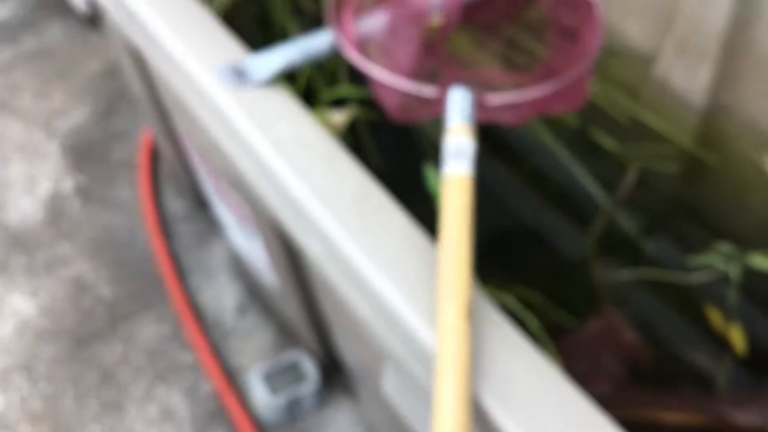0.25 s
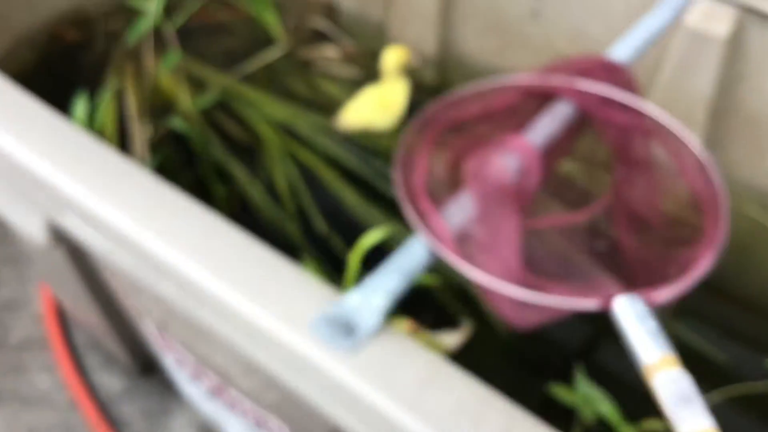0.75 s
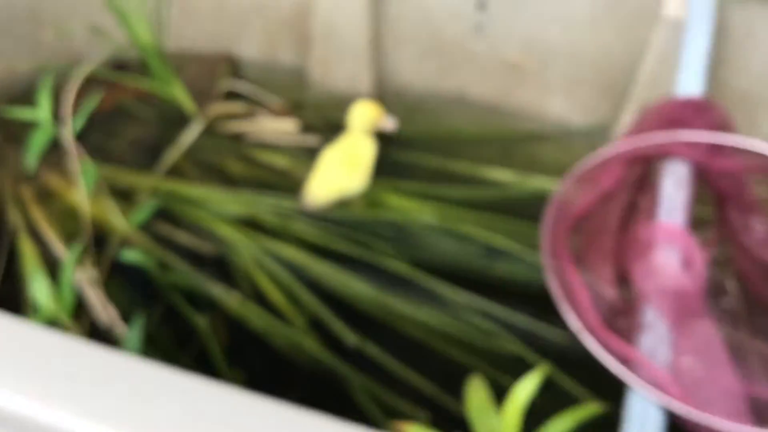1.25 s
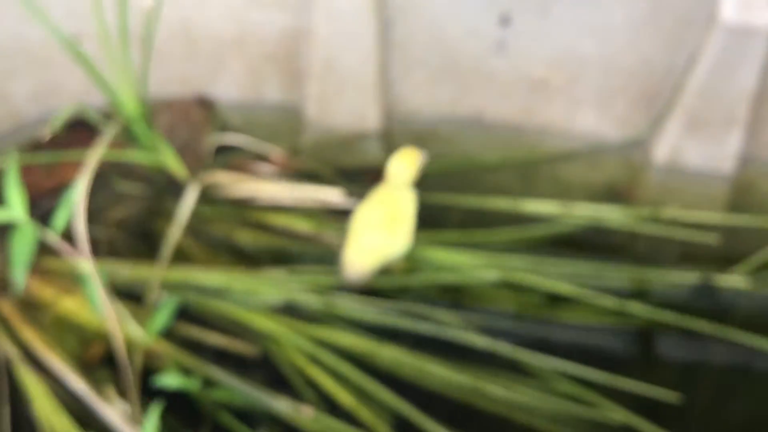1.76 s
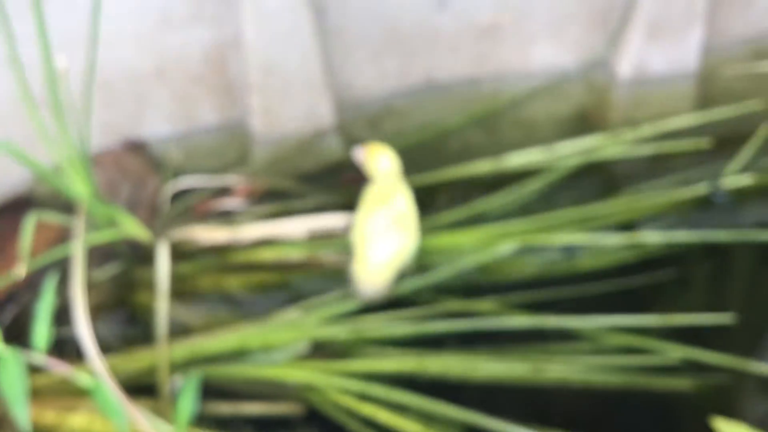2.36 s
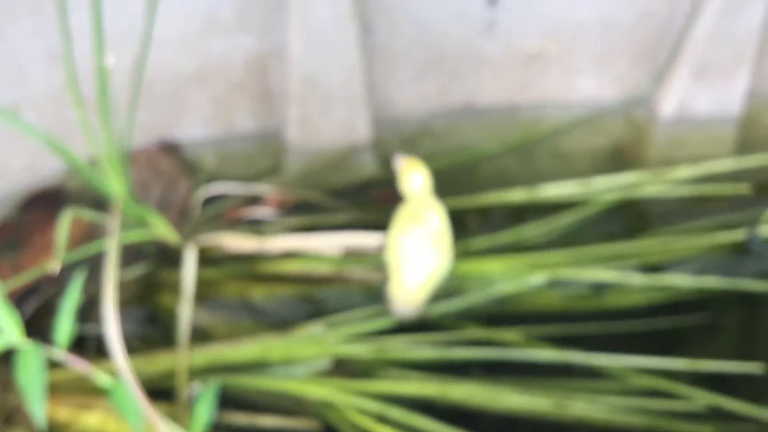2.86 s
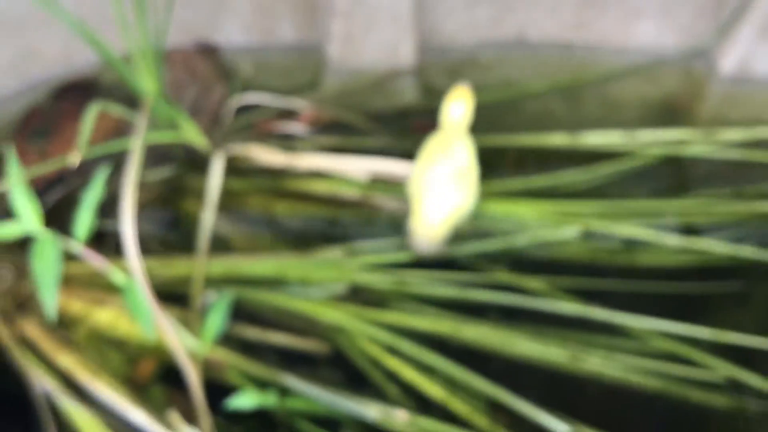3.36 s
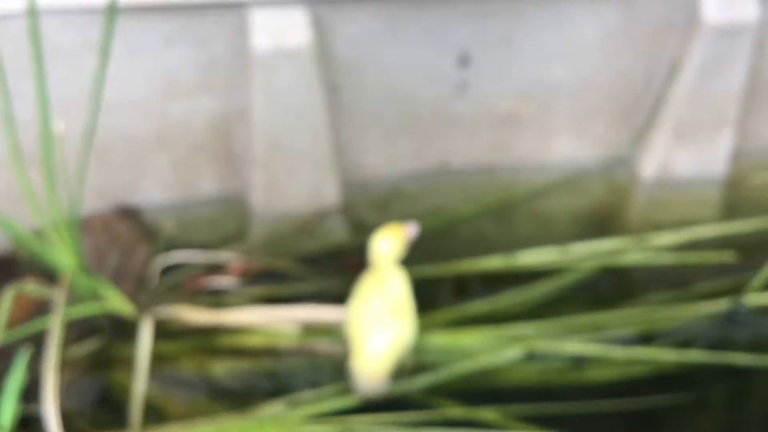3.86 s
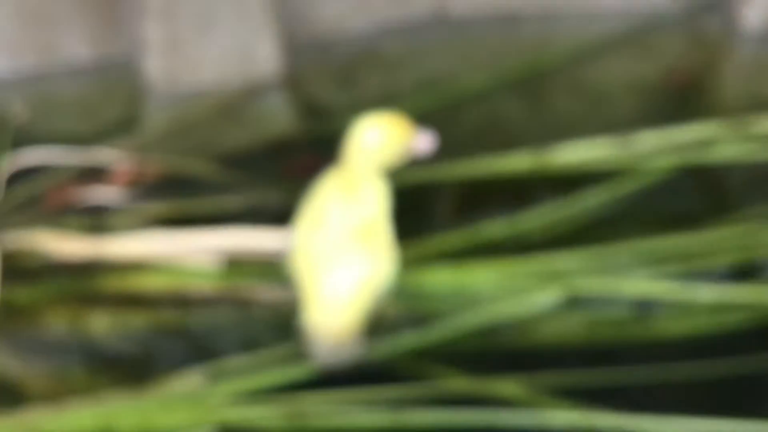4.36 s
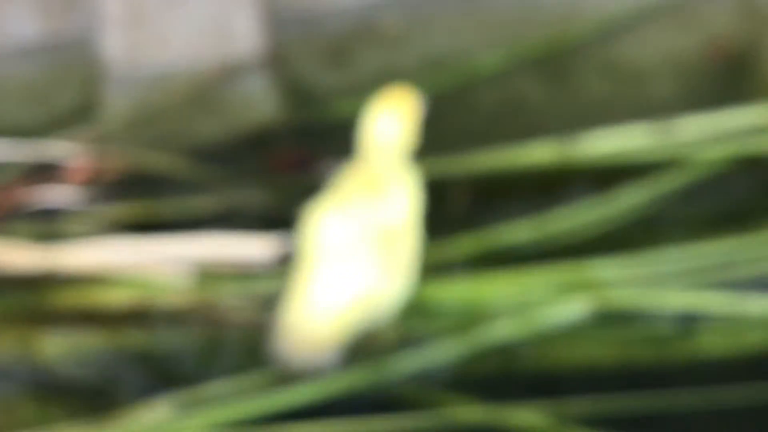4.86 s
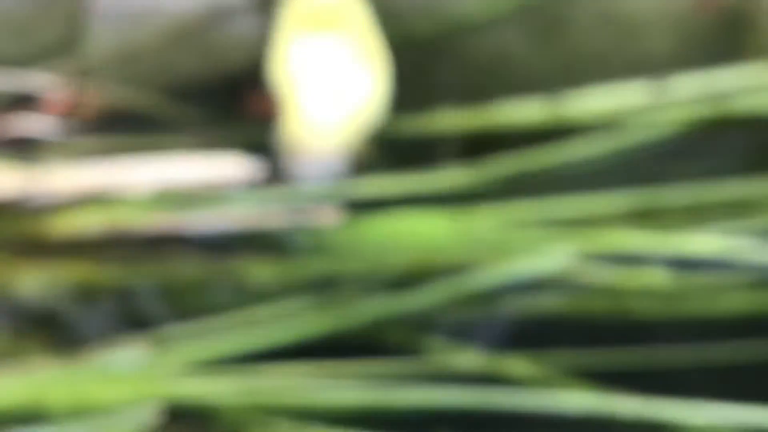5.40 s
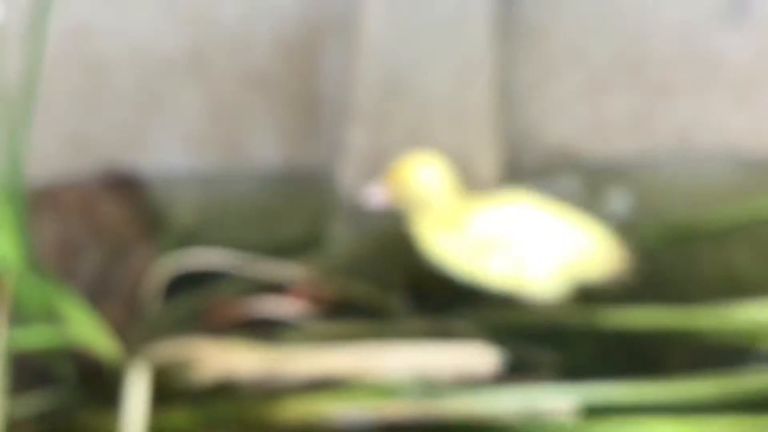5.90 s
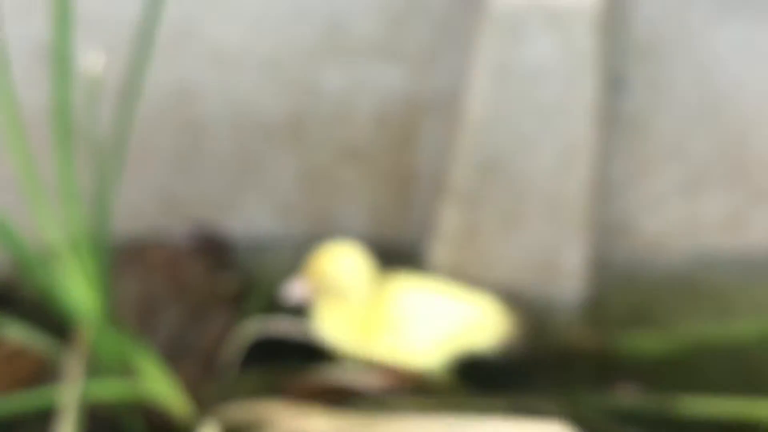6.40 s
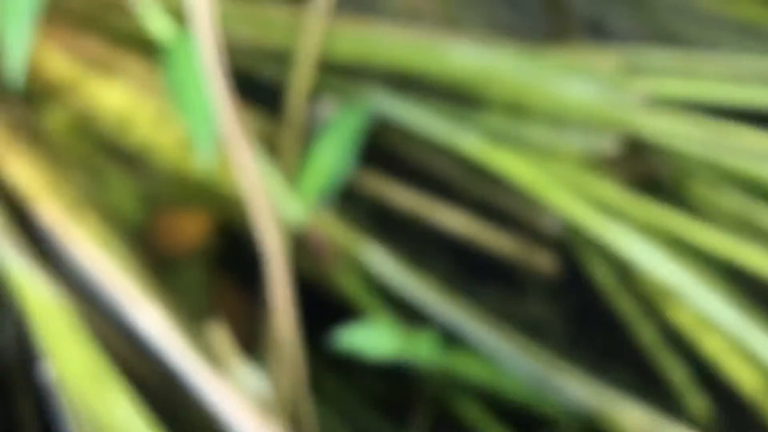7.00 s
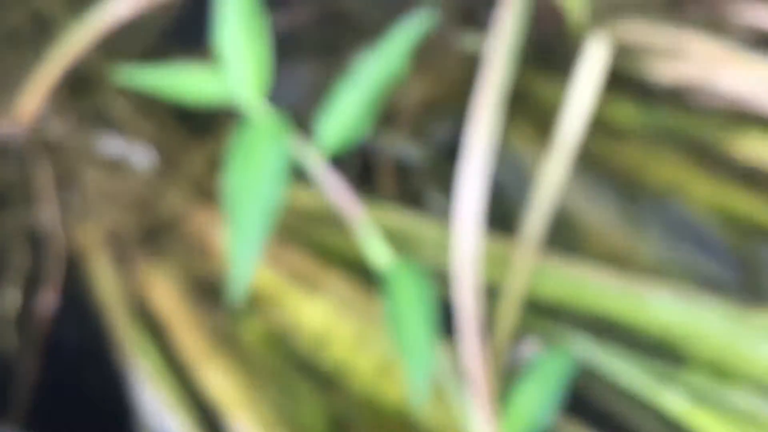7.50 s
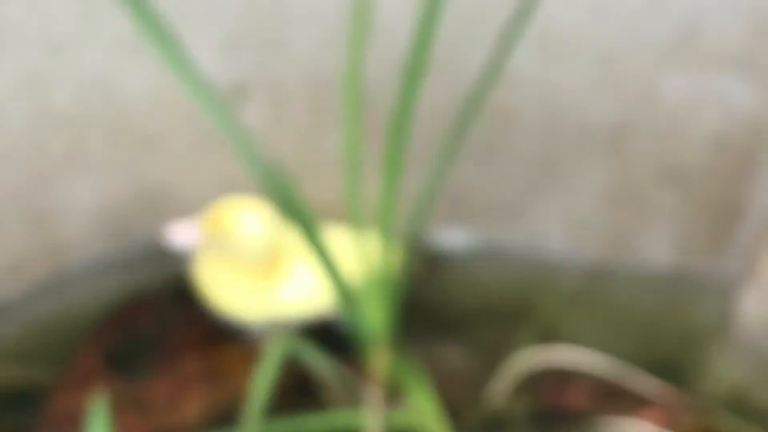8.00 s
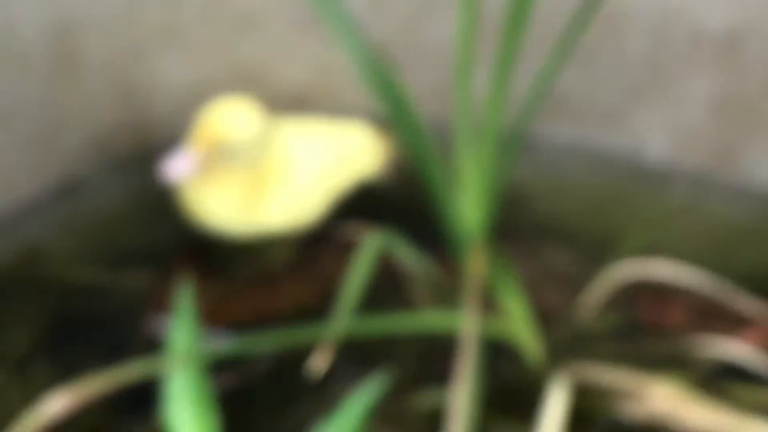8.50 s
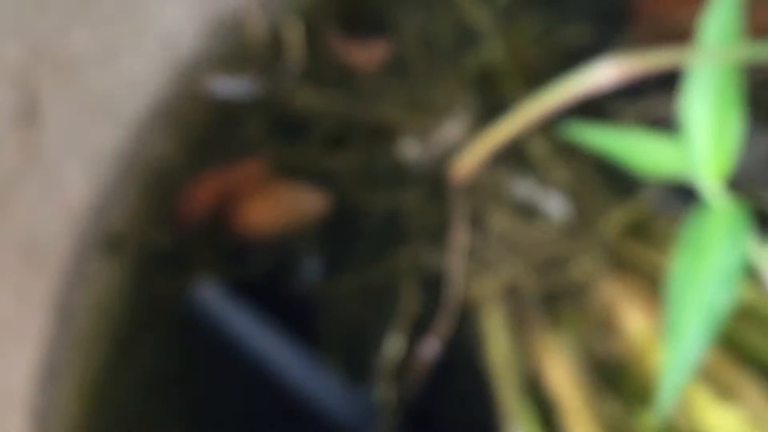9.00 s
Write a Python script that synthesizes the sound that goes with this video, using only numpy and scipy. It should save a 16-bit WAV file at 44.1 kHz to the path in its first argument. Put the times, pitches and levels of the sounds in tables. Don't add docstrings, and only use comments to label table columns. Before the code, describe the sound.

A duckling gives a long run of piercing, quick peeps inside a plastic tub, with close scuffs, bumps and taps, then a pause and three last peeps.

```python
import sys
import numpy as np
from scipy import signal
from scipy.fft import rfft, irfft
from scipy.io import wavfile
from scipy.ndimage import uniform_filter1d

SR = 44100
rng = np.random.default_rng(int(sys.argv[2]) if len(sys.argv) > 2 else 0)


def file_out(sig):
    cols = np.atleast_2d(sig).T
    lim = np.clip(cols, -1, 1)
    pcm = np.round(lim * 32767).astype(np.int16)
    wavfile.write(sys.argv[1], SR, pcm)


def magnitude_from_level(level_db):
    exponent = np.asarray(level_db, float) / 20
    return 10 ** exponent


N = 407925

# start_s, length_s, effort_db, crest_pitch_hz, crest_after_start_s
PEEPS = [(.8, .064, -36.5, 3980, 0.011), (1.015, .081, -19.5, 3883, .016),
         (1.225, 0.09, -16.5, 3900, 0.028), (1.442, 0.093, -12, 3964, 0.04),
         (1.662, 0.098, -12.5, 3963, 0.023), (1.892, 0.097, -10.5, 4084, 0.037),
         (2.119, 0.1, -9, 4112, .04), (2.359, 0.092, -9, 4067, 0.036), (2.606, 0.083, -8.5, 3936, .052),
         (2.841, 0.067, -17, 4170, 0.0069), (3.048, 0.091, -11.5, 4152, 0.036),
         (3.272, 0.095, -9.5, 4076, 0.05), (3.525, 0.086, -8, 4153, 0.031), (3.762, 0.094, -8, 4036, 0.036),
         (4.012, .095, -9.5, 4047, .035), (4.259, 0.094, -7, 4105, 0.026),
         (4.503, 0.095, -6.5, 4080, 0.037), (4.76, 0.098, -8, 4003, .04), (5.007, 0.096, -12, 3898, 0.027),
         (7.076, .056, -25, 3696, .012), (7.304, .083, -18.5, 3837, 0.024),
         (7.576, 0.088, -11, 3976, 0.021)]
# beat_depth (0-1), windpipe_air_db, half_lines_db (re whistle), overtones_db,
# pitch_before_drop_hz
VOICES = [(0.45, 2, -11, -77, 3550), (0.9, 4, -30, -57, 3230), (0.5, 6.5, -30.5, -52, 3470),
          (0.55, 1, -33, -45, 3460), (0.33, 2, -27.5, -44, 3480), (0.3, -28.5, -46.5, -48, 3620),
          (0.52, -20, -28.5, -47, 3570), (0.49, -1, -45, -44, 3520), (0.56, 7.5, -23, -45, 3620),
          (0.7, 7.5, -42, -45.5, 3510), (0.64, -6, -26.5, -42.5, 3560), (0.55, -1.5, -28, -43, 3580),
          (0.54, 1.5, -27, -43, 3550), (.3, 5, -33, -44, 3550), (0.3, 5, -27, -43.5, 3440),
          (0.3, 7.5, -34.5, -44.5, 3500), (0.3, 0, -28, -42.5, 3480), (0.41, 3.5, -39.5, -44, 3550),
          (0, -3.5, -31, -43.5, 3500), (0, -21, -22.5, -52.5, 3450), (0.52, 3, -22.5, -43.5, 3480),
          (0.5, -7, -28, -41.5, 3600)]
# time_s, onset_pitch_hz, full_effort_after_s, later_fade_db, final_drop_s
MOOD = [(.8, 3520, 0.052, -2, 0.024), (1.0, 3330, .034, -7, .007), (1.25, 3270, 0.039, -8, .011),
        (1.7, 3394, 0.058, -10, .0105), (2.1, 3484, 0.039, -10.5, 0.012), (2.6, 4110, 0.024, -7, .011),
        (2.85, 4230, 0.01, -6.5, .011), (3.1, 3920, 0.033, -11.5, 0.0098), (4.5, 3886, .025, -18, 0.012),
        (4.759, 3870, 0.039, -17.5, 0.017), (5.0, 3920, 0.054, -11.5, .012), (7.1, 3680, 0.033, -7, 0.021),
        (7.3, 3700, 0.019, -5, 0.024), (7.6, 3780, 0.025, -15.5, .02)]
# multiple (of the pitch), level_db
OVERTONES = [(2, 1.5), (3, 1), (4, -8), (5, -17)]
# multiple (of the pitch), level_db
HALF_LINES = [(.5, -8), (1.5, 2.5), (2.5, -12), (3.5, -12)]
# frequency_hz, level_db
BEAK_ASIDE = [(2000, 0), (3400, 0), (4000, -10), (7000, -5)]
# delay_s, level_db
WALL_ECHOES = [(.0031, -1.5), (.0057, -15.5), (.0092, -12.5), (0.014, -15.5)]
# start_s, peak_db, spread_cycles (per e-fold of time), t60_s, tick_db
BUMPS = [(0.82, -39.5, 1.6, 0.051, -50), (0.892, -30.5, 1.8, 0.078, -42),
         (1.131, -37.5, 1.7244, 0.084, -58), (1.461, -37, 1.8256, 0.057, -53),
         (1.568, -23.5, 2.08, 0.037, -53), (1.769, -37, 1.9, 0.089, -62), (2.546, -38, 1.34, 0.13, -65),
         (2.964, -35.5, 1.44, 0.036, -51), (6.351, -26.5, 1.91, 0.031, -59),
         (6.719, -43, 1.9356, 0.08, -55.5), (6.81, -41, 1.9047, 0.0642, -51.5),
         (7.993, -43, 1.596, 0.08, -58.5), (8.459, -57.5, 1.67, 0.0825, -59)]
# start_s, peak_db, ring_pitch_hz, t60_s, tick_db
TAPS = [(0.279, -44.5, 408, 0.064, -60), (0.39, -49, 2980, .02, -46), (1.28, -40.5, 494, 0.086, -51),
        (1.946, -32.5, 500, 0.01, -35), (2.311, -25, 503, 0.017, -35), (2.322, -53, 675, .03, -32.5),
        (2.303, -26.5, 670, 0.029, -41), (2.861, -43, 514, .04, -48), (5.437, -49, 1160, 0.073, -47),
        (5.743, -34.5, 1011, 0.013, -42.5), (5.746, -37, 453.3, .022, -47), (6.877, -50, 814, 0.0326, -48)]
# start_s, peak_db
STEM_SNAP = (2.8615, -16.5)
# start_s, rise_s, fall_s, sole_drag_db, grit_hiss_db
SCUFFS = [
    (.255, 0.023, 0.017, -46.5, -82),
    (1.125, 0.0087, 0.39, -42, -52.5),
    (1.5, 0.063, 0.24, -48.5, -62),
    (1.78, 0.13, 0.18, -46.5, -54),
    (2.298, 0.0072, 0.042, -30.5, -49),
    (2.499, 0.07, .05, -58, -59),
    (2.56, 0.26, .15, -48.5, -47.5),
    (6.21, 0.049, 0.01596, -50.5, -77),
    (7.02, 0.047, 0.043, -50.5, -57),
]
# frequency_hz, t60_s
YARD_DECAY = [(300, 0.16), (2500, 0.093), (4000, 0.29), (8000, 0.089), (16000, .15)]
# frequency_hz, density_db (per Hz)
HUM_COLOUR = [(15, -41), (25, -42), (64, -4.5), (120, -1.5), (166, -8.5), (223, -11.5), (344, -10),
              (560, -11), (641, -13), (1560, -23), (2550, -24.5), (3520, -23), (7310, -29.5), (8590, -30.5),
              (16000, -37.5)]
# time_s, level_db
RUMBLE = [(0.0, -58.5), (0.82, -58.5), (0.93, -47.5), (0.95, -60), (1.34, -56), (1.39, -63.5), (1.59, -53),
          (1.65, -67), (1.88, -55.5), (2.19, -64), (2.24, -54.5), (5.54, -65.5), (5.74, -57), (8.27, -59),
          (8.55, -54), (8.6, -60.5), (9.07, -56), (9.25, -59.5)]


def evened(x):
    return x / np.sqrt(np.mean(x ** 2) + 1e-20)


def read(points, hz):
    f, value = np.transpose(points)
    return np.interp(np.log(hz + 1), np.log(f + 1), value)


def add(mix, start_s, sound):
    part = mix[round(start_s * SR):][:len(sound)]
    part += sound[:len(part)]


def band(x, lo_hz, hi_hz, order=2):
    edges = [lo_hz, min(hi_hz, SR / 2 - 100)]
    return signal.sosfilt(signal.butter(order, edges, "band", fs=SR, output="sos"), x)


def hiss(size, lo_hz, hi_hz, order=2):
    return band(rng.standard_normal(size), lo_hz, hi_hz, order)


def wander(size, hz):
    return evened(hiss(size + 2000, hz / 4, hz)[2000:])


def breath(start_s, length, peak_db, crest_hz, crest_s, half_db, upper_db, knee_hz):
    at, *mood = np.transpose(MOOD)
    onset_hz, peak_s, fade_db, drop_s = (np.interp(start_s, at, c) for c in mood)
    t = np.arange(0, length + 0.0041, 1 / SR)
    knee_s = length - drop_s
    drop = np.maximum(t - knee_s, 0) / drop_s

    climb = np.clip(1 - t / crest_s, 0, 1) ** 2.6
    sag = np.clip((t - crest_s) / (knee_s - crest_s), 0, 1) ** 1.8
    hz = crest_hz - (crest_hz - onset_hz) * climb - (crest_hz - knee_hz) * sag
    hz = hz - (knee_hz - 2460) * drop

    effort_db = peak_db - 17 * np.exp(-(t / 0.008) ** 2) - 16.5 * np.clip(1 - t / peak_s, 0, 1)
    effort_db = effort_db + fade_db * np.clip((t - peak_s) / (knee_s - peak_s), 0, 1) - 21 * drop

    half_db = half_db - 2.53 * np.maximum(effort_db + 23.5, 0)
    upper_db = upper_db - 33.5 * np.exp(-(t / 0.016) ** 2) - 1 * (t / knee_s - 0.5) - 21.5 * drop
    slope_db = -0.9 + 0.99 * min(peak_db + 21, 0)
    return t, slope_db, (effort_db, hz, half_db, upper_db)


def membranes(t, hz, depth):
    size = len(t)
    shake = 0.004 + 0.008 * np.exp(-(t / 0.025) ** 2)
    turn = 2 * np.pi * np.cumsum(hz * (1 + shake * wander(size, 260))) / SR
    depth = np.clip(depth, 0, 1)
    apart_hz, lag = rng.uniform([65, 0], [120, 2 * np.pi])
    apart = lag + 2 * np.pi * np.cumsum(apart_hz * (1 + 0.5 * wander(size, 40))) / SR
    beat = (np.sin(turn) + depth * np.sin(turn - apart)) / np.sqrt(1 + depth ** 2)
    return turn, beat


def overtones(turn, hz, upper_db, slope_db, air_db, early):
    size = len(turn)
    flutter = magnitude_from_level(air_db) * (0.14 + 0.25 * early) * wander(size, 530)
    total = np.zeros(size)
    for k, db in OVERTONES:
        level_db = db + upper_db + slope_db * (k - 2.5)
        level_db = level_db + 2.4 * wander(size, 198.6) + 3.0 * wander(size, 30)
        blur = 0.07 * k * magnitude_from_level(air_db) * wander(size, 350)
        audible = np.clip((16000 - k * hz) / 300, 0, 1)
        total += magnitude_from_level(level_db) * (1 + flutter) * np.sin(k * turn + blur) * audible
    return total


def half_lines(turn, level_db, slope_db, early):
    size = len(turn)
    total = np.zeros(size)
    for k, db in HALF_LINES:
        line_db = db + level_db + slope_db * (k - 0.5) + 6.7 * wander(size, 40)
        rough = 1 + 1.1 * (0.21 + early) * wander(size, 300)
        total += magnitude_from_level(line_db) * rough * np.sin(k * turn)
    return total


def rasp(t, effort_db, upper_db, half_level_db, early):
    size = len(t)
    unlocked = np.exp(-((t - 0.016) / 0.0077) ** 2)
    air = evened(hiss(size, 3300, 5100)) + 0.3 * evened(hiss(size, 5000, 15000, order=1))
    leak = (magnitude_from_level(0.448 * effort_db - 30) * unlocked + magnitude_from_level(upper_db - 11.5) * early) * air
    haze = evened(hiss(size, 4300, 6800) + 0.35 * hiss(size, 6800, 15500))
    return leak + magnitude_from_level(half_level_db - 4.5) * (0.28 + early) * haze


def peep(start_s, length, peak_db, crest_hz, crest_s, depth, air_db, *colour):
    t, slope_db, columns = breath(start_s, length, peak_db, crest_hz, crest_s, *colour)
    effort_db, hz, half_db, upper_db = (uniform_filter1d(c, size=90) for c in columns)
    effort_db = effort_db - 0.35 * np.maximum(effort_db + 17, 0)
    slope_db = slope_db - np.clip((3400 - hz) / 60, 0, 12)
    half_level_db = effort_db + half_db
    early = np.clip(1 - t / 0.056, 0, 1)

    turn, beat = membranes(t, hz, depth)
    whistle = magnitude_from_level(effort_db + 2.5) * beat
    windpipe_db = effort_db + air_db - 31.5 + 17.4 * early
    windpipe = magnitude_from_level(windpipe_db) * evened(hiss(len(t), 3775, 4500, order=4))
    voice = whistle + windpipe
    voice = voice + overtones(turn, hz, upper_db, slope_db, air_db, early)
    voice = voice + half_lines(turn, half_level_db, slope_db, early)
    voice = voice + rasp(t, effort_db, upper_db, half_level_db, early)
    return start_s, voice * signal.windows.tukey(len(t), 0.07)


def aside(x):
    hz = np.fft.rfftfreq(len(x), 1 / SR)
    return irfft(rfft(x) * magnitude_from_level(read(BEAK_ASIDE, hz)), len(x))


def tub(x):
    age = np.arange(4000) / SR
    walls = magnitude_from_level(-35 - 60 * age / 0.12) * rng.standard_normal(len(age)) * (age > 0.004)
    shifts = rng.uniform(0.85, 1.15, len(WALL_ECHOES))
    for (delay_s, db), shift in zip(WALL_ECHOES, shifts):
        walls[round(delay_s * shift * SR)] += magnitude_from_level(db)
    direct = age == 0
    return signal.fftconvolve(x, aside(walls) + direct)


def tick(t, db):
    return magnitude_from_level(db - 60 * t / 0.02) * evened(hiss(len(t), 790, 2600))


def bump(start_s, db, spread, t60, tick_db):
    t = np.arange(6600) / SR
    wave = np.sin(2 * np.pi * spread * np.log(1 + t / 0.0012)) * (1 - np.exp(-t / 0.0015))
    fade_db = db + 1 - 60 * t / np.clip(t60, 0.01, 0.3)
    return start_s, magnitude_from_level(fade_db) * wave + tick(t, tick_db)


def tap(start_s, db, hz, t60, tick_db):
    t = np.arange(4400) / SR
    rising_hz = hz * (1 + 0.041 * t / 0.027)
    ring = np.sin(2 * np.pi * np.cumsum(rising_hz) / SR) * (1 - np.exp(-t / 0.00075))
    fade_db = db + 6 - 60 * t / np.clip(t60, 0.005, 0.3)
    return start_s, magnitude_from_level(fade_db) * ring + tick(t, tick_db)


def snap(start_s, db):
    t = np.arange(300) / SR
    burst = rng.standard_normal(len(t)) * 0.3836 + (t == 0) * 3
    return start_s, magnitude_from_level(db) * band(np.exp(-t / 0.0003715) * burst, 901, 12000, order=1)


def scuff(start_s, rise, fall, drag_db, grit_db):
    t = np.arange(0, rise + fall, 1 / SR)
    off = np.maximum(1 - t / rise, (t - rise) / fall) ** 1.07
    uneven_db = 1.2 * wander(len(t), 250) + 1.3 * wander(len(t), 40)
    slips = rng.standard_normal((2, len(t))) * magnitude_from_level(uneven_db)
    sole = evened(band(slips[0], 255, 788, order=3) + 0.22 * band(slips[0], 865, 3540))
    drag = magnitude_from_level(drag_db - 15.5 * off) * sole
    grit = magnitude_from_level(grit_db + 2.5 - 17.5 * off) * evened(band(slips[1], 2200, 16000, order=1))
    return start_s, (drag + grit) * signal.windows.tukey(len(t), 0.04)


def yard(x):
    taps = np.zeros(SR)
    at = np.arange(300, SR - 20, 20)
    taps[at + rng.integers(0, 20, len(at))] = rng.choice([-1., 1.], len(at))
    hz, t, z = signal.stft(taps, SR, nperseg=256)
    decay = magnitude_from_level(-60 * t / read(YARD_DECAY, hz)[:, None])
    tail = signal.istft(z * decay, SR, nperseg=256)[1]
    return signal.fftconvolve(x, tail / np.linalg.norm(tail))[:N]


def traffic():
    frames, hz = N // 256 + 5, np.fft.rfftfreq(1024, 1 / SR)
    a, b, patches = rng.standard_normal((frames, 513, 3)).T
    patches = uniform_filter1d(patches, 12, 0)
    patches = evened(uniform_filter1d(patches, 14, 1))
    patch_db = read([(120, 2.5), (600, 1.1)], hz)[:, None] * patches
    s, db = np.transpose(RUMBLE)
    swell_db = np.interp(np.arange(frames) * 256 / SR, s, db - db.mean())
    share = read([(130, 0.89), (250, 0.2), (4000, 0.083)], hz)[:, None]
    z = (a + 1j * b) * magnitude_from_level(read(HUM_COLOUR, hz)[:, None] + patch_db + share * swell_db)
    hum = signal.istft(z, nperseg=1024, noverlap=768)[1][:N]
    return magnitude_from_level(-53.5) * evened(hum)


def scene():
    bird, near = np.zeros(N), np.zeros(N)
    for row, voice in zip(PEEPS, VOICES):
        start_s, sound = peep(*row, *voice)
        add(bird, start_s, tub(sound))
    for row in BUMPS:
        add(near, *bump(*row))
    for row in TAPS:
        add(near, *tap(*row))
    add(near, *snap(*STEM_SNAP))
    for row in SCUFFS:
        add(near, *scuff(*row))
    reverb = yard(magnitude_from_level(-21.5) * aside(bird) + magnitude_from_level(-14) * near)
    return (bird + near + reverb + traffic())[None]


def top_cut(x):
    return signal.sosfilt(signal.butter(12, 16510, fs=SR, output="sos"), x)


def record(dry):
    heard = signal.sosfilt(signal.butter(6, 52, "high", fs=SR, output="sos"), dry)
    edge = signal.firwin(511, 15900, window=("kaiser", 9), fs=SR)[None]
    mix = signal.oaconvolve(heard, edge, "same")
    return top_cut(mix)


dry = scene()
out = record(dry)
file_out(out)
```